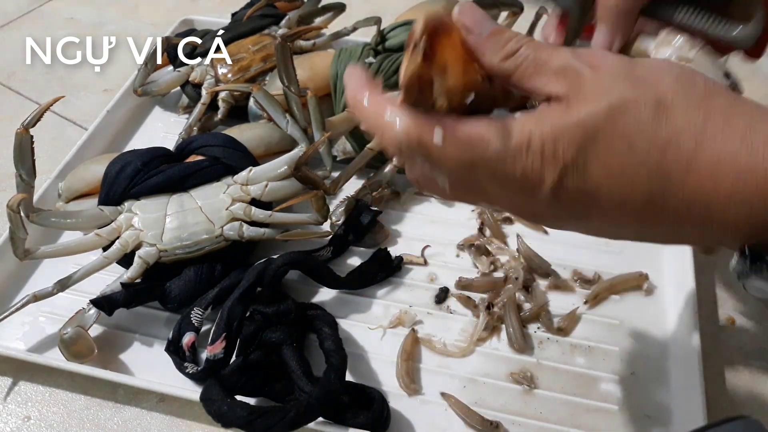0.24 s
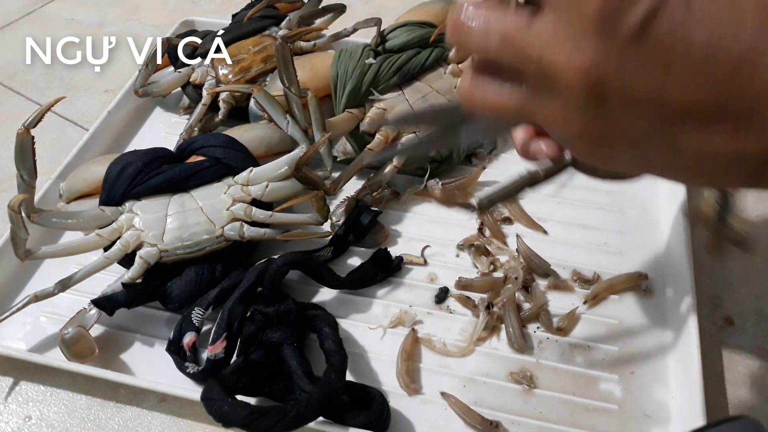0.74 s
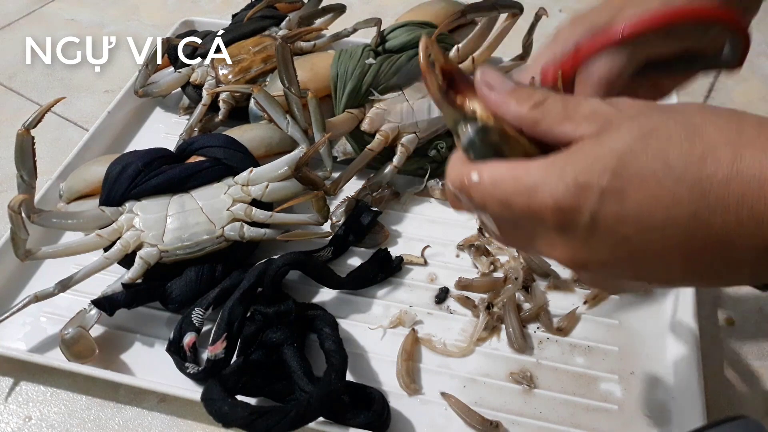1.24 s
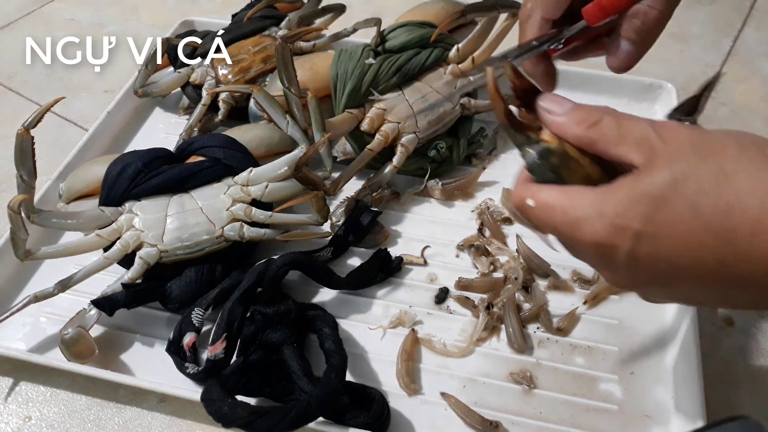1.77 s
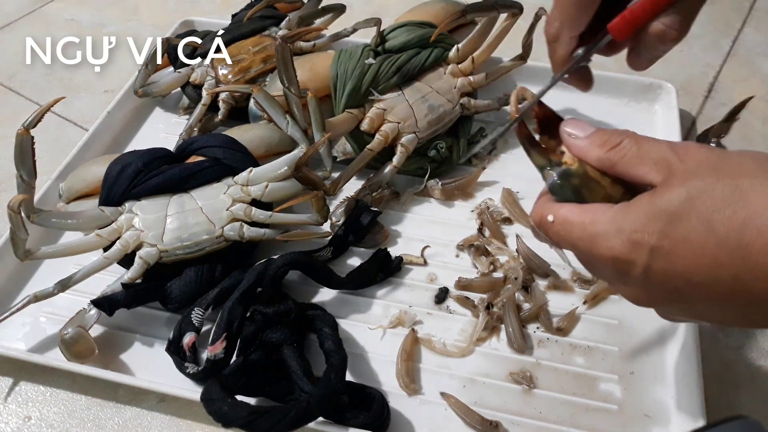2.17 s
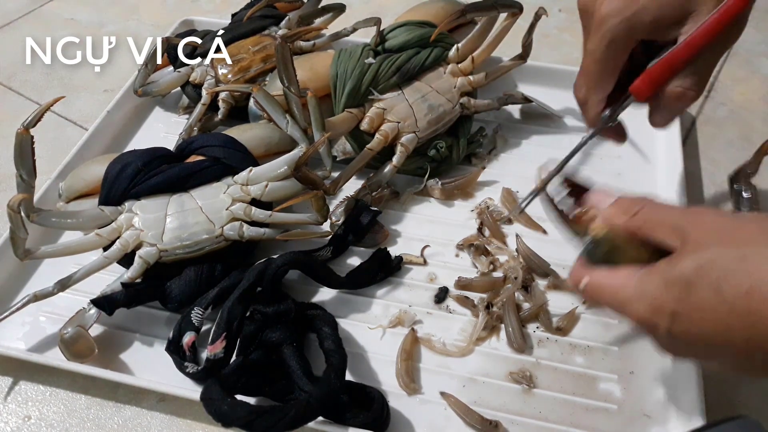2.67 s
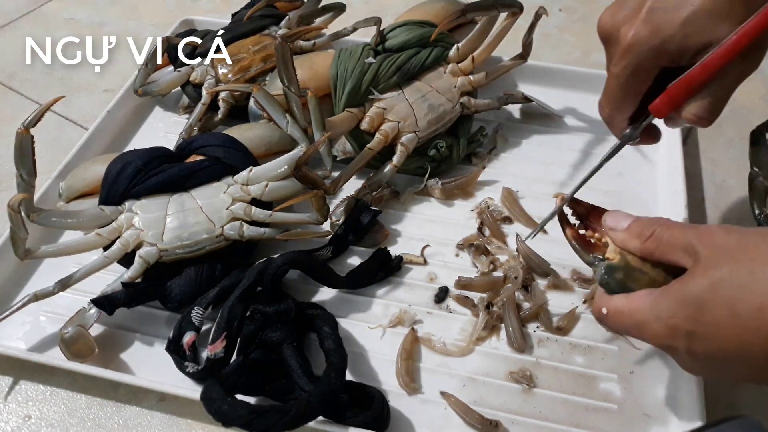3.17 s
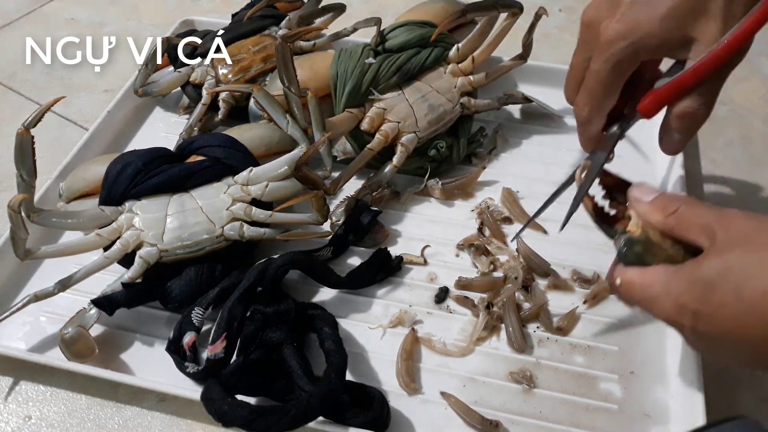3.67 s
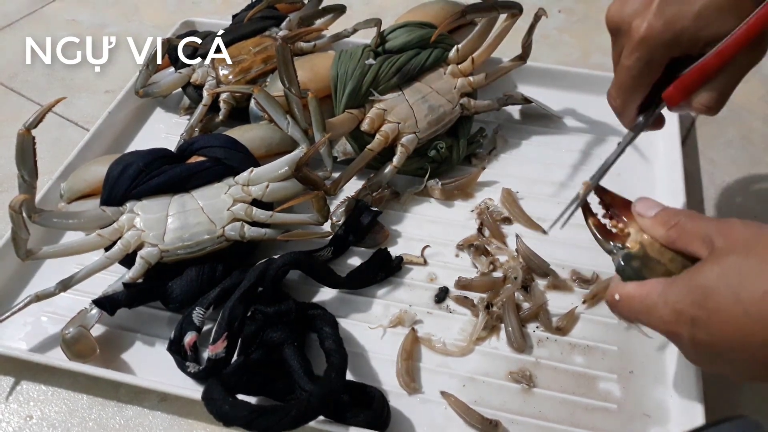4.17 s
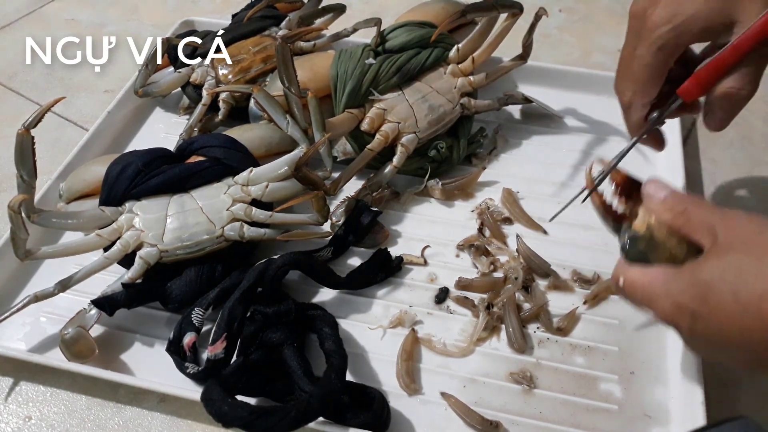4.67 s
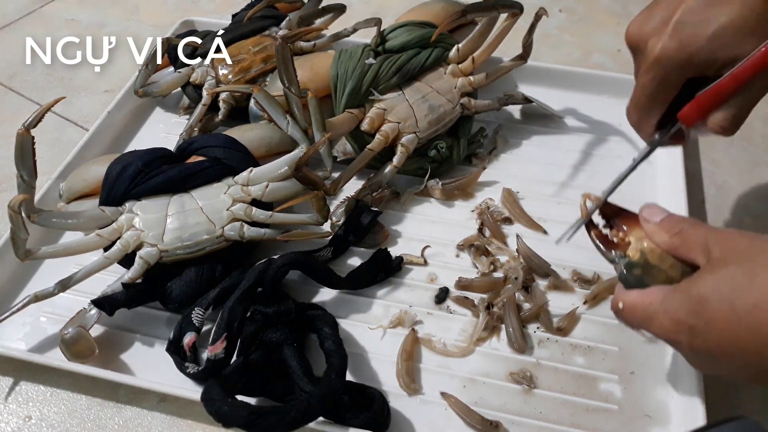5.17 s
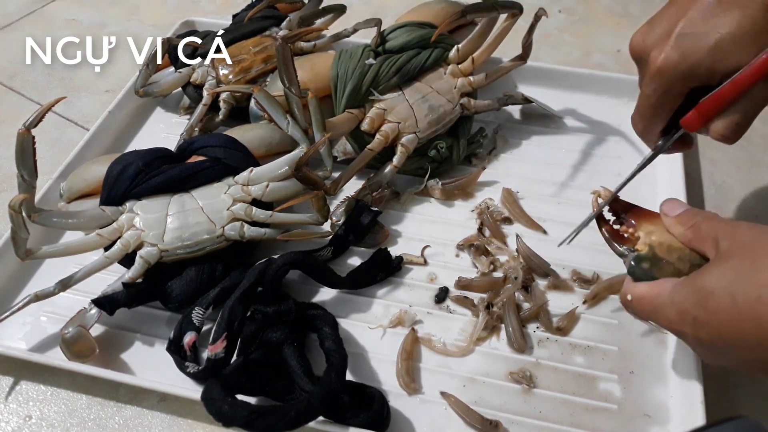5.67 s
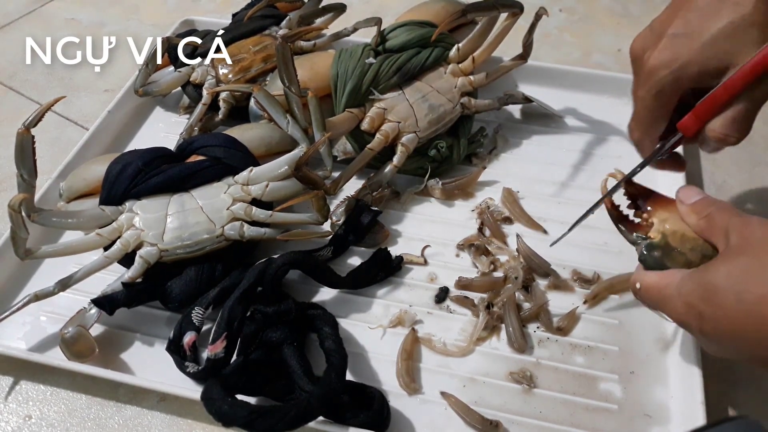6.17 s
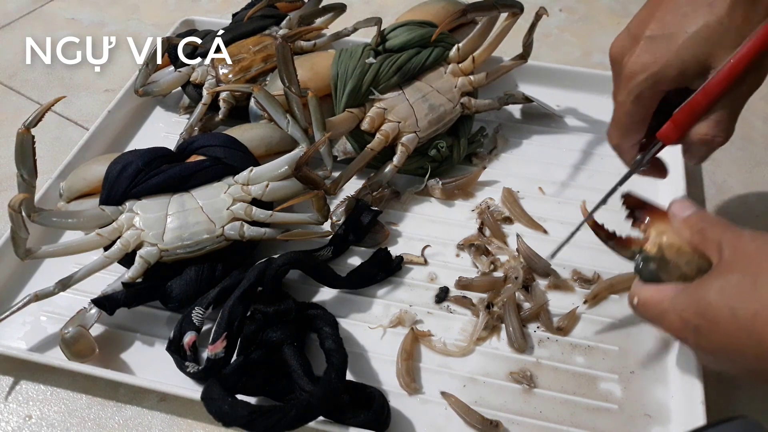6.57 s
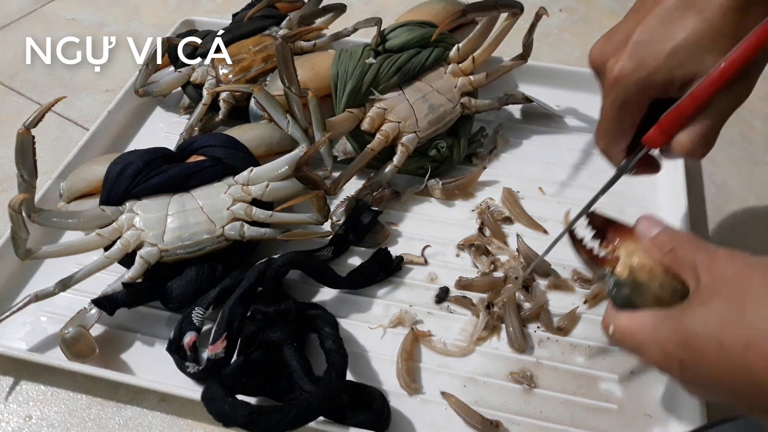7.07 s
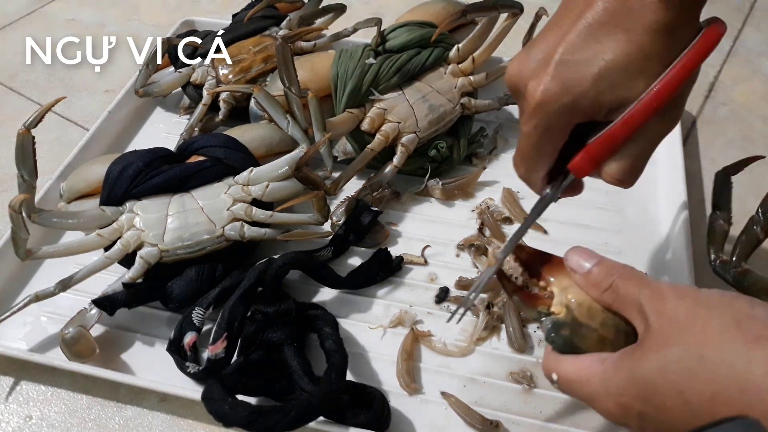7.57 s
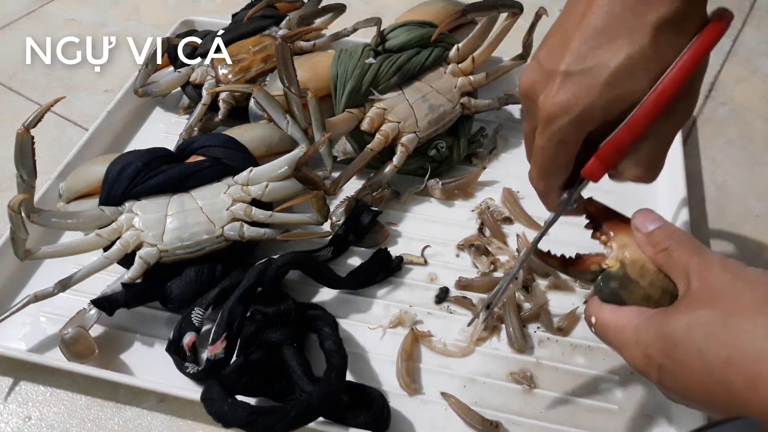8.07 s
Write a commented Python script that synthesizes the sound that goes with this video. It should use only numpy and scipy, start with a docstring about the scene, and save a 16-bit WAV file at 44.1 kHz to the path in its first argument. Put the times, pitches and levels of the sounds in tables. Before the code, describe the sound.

Close, crisp snaps of crab shell breaking under scissors come in irregular bursts, the blades grating and clicking between cuts.

```python
"""Kitchen scissors bite through a crab claw, close by, in a hard-walled room open to the street.
Each bite is a few milliseconds of fractures that ring the shell and the piece breaking off.
The blades grate on the shell between bites and ring when they meet; the claw gives a few low jolts.
Under it all lie an outdoor rumble, thin air noise, a faint hum and, at times, a hiss like far insects."""
import sys
import numpy as np
from scipy import signal
from scipy.fft import rfft, irfft
from scipy.io import wavfile

SR = 44100
rng = np.random.default_rng(int(sys.argv[2]) if len(sys.argv) > 2 else 0)


def unload_audio(sound):
    """Save the sound as a 16-bit wav file, at the path given as the first command line argument."""
    columns = np.transpose(np.atleast_2d(sound))
    # keep every value between -1 and 1, then stretch to whole-number steps
    steps = np.round(np.clip(columns, -1, 1) * 32767)
    wavfile.write(sys.argv[1], SR, steps.astype(np.int16))


N = 366471


def amp(db):
    """dB to gain."""
    return 10 ** (np.asarray(db) / 20)


def unit_rms(x):
    """Scale to rms 1."""
    return x / np.sqrt(np.mean(x ** 2) + 1e-20)


def curves(rows):
    """Breakpoint columns at every sample."""
    times_s, *columns = np.transpose(rows)
    return [np.interp(np.arange(N) / SR, times_s, column) for column in columns]


def band(x, low_hz, high_hz):
    """Band-pass."""
    sos = signal.butter(2, [low_hz, high_hz], "band", fs=SR, output="sos")
    return signal.sosfilt(sos, x + 1e-18)


def resonances(x, modes):
    """Parallel resonators with alternating signs."""
    out = 0
    for k, (pitch_hz, width_hz, level_db) in enumerate(modes):
        r = np.exp(-np.pi * width_hz / SR)
        b = [(1 - r * r) / 2, 0, (r * r - 1) / 2]
        a = [1, -2 * r * np.cos(2 * np.pi * pitch_hz / SR), r * r]
        out = out + (-1) ** k * amp(level_db) * signal.lfilter(b, a, x + 1e-18)
    return out


def coloured_noise(spectrum):
    """Steady noise with the given spectrum; rms 1."""
    freq_hz, level_db = np.transpose(spectrum)
    bins_hz = np.maximum(np.fft.rfftfreq(N, 1 / SR), 1)
    gains = amp(np.interp(np.log(bins_hz), np.log(freq_hz), level_db))
    return unit_rms(irfft(rfft(rng.standard_normal(N)) * gains, N))


def narrow_noise(pitch_hz, width_hz):
    """Noise twice through one resonator; rms 1."""
    mode = [(pitch_hz, width_hz, 0)]
    return unit_rms(resonances(resonances(rng.standard_normal(N), mode), mode))


def grit(rate_per_s, spread_db):
    """Random clicks, sizes scattered by spread_db; rms 1."""
    sizes = amp(spread_db * np.minimum(rng.exponential(1, N), 4)) * rng.choice([-1, 1], N)
    return unit_rms(sizes * (rng.random(N) < rate_per_s / SR))


def bursts(starts_s, levels_db, holds_ms, rise_ms, fade_ms, sag_db_per_ms=0.28):
    """Envelope: each burst rises, sags while it holds, then fades."""
    out, age_ms = np.zeros(N), np.arange(SR // 20) * 1000 / SR
    onset = (1 - np.exp(-age_ms / rise_ms)) * amp(-sag_db_per_ms * age_ms)
    for start_s, level_db, hold_ms in zip(starts_s, levels_db, holds_ms):
        shape = amp(level_db) * onset * np.exp(-np.maximum(age_ms - hold_ms, 0) / fade_ms)
        at = round(start_s * SR)
        out[at:at + len(shape)] += shape[:N - at]
    return out


# Rumble spectrum: freq_hz, density_db
RUMBLE_SPECTRUM = [(12, -49.5), (20, -24), (37, -13.5), (97, -1.5), (134, -4.5), (167, -0.5), (260, -7),
                   (288, -7.5), (398, -8.5), (528, -14), (608, -14), (1640, -29), (2500, -39),
                   (3250, -69.5), (5500, -120)]
# Hums in the rumble: pitch_hz, width_hz, level_db
HUMS = [(46.5, 1.7, -12.5), (101.6, 14, -6), (172, 29, -12), (261, 9.1, -7.5), (399.8, 24, -17)]
# Air noise spectrum: freq_hz, density_db
AIR_SPECTRUM = [(900, -39.5), (1300, -14), (2000, -15), (2700, -15.5), (3600, -11), (4800, -11.5),
                (6300, -18.5), (7300, -13), (8800, -18.5), (9500, -31.5), (13000, -23.5), (16000, -27.5)]
# Background levels, sinking after the loudest cracks, then swelling: time_s, rumble_db, air_db
BACKGROUND_LEVELS = [(0, -47, -62), (1, -48, -63), (2, -48, -63), (3, -47, -63), (4, -46.5, -57.5),
                     (5, -47, -60.5), (5.58, -46, -54.5), (5.75, -51.5, -76), (6.2, -54.5, -44.5),
                     (6.5, -57, -63.5), (6.9, -54, -65.5), (7.1, -53.5, -71), (7.35, -48.5, -67),
                     (7.62, -43.5, -62.5), (7.94, -41.5, -56.5), (8.17, -37.5, -61.5), (8.31, -40, -52)]


def background():
    """Low rumble with wavering hums, and thin air noise."""
    rumble_db, air_db = curves(BACKGROUND_LEVELS)
    modes = [(hz, width_hz, db - 10 * np.log10(width_hz)) for hz, width_hz, db in HUMS]
    hums = unit_rms(resonances(rng.standard_normal(N), modes))
    rumble = coloured_noise(RUMBLE_SPECTRUM) + amp(-4) * hums
    return amp(rumble_db) * rumble + amp(air_db) * coloured_noise(AIR_SPECTRUM)


# Hiss bands: pitch_hz, width_hz, level_db
HISS_BANDS = [(4590, 470, -3), (4870, 240, -4)]
# Hiss envelope: time_s, level_db
HISS_LEVELS = [(0, -57.5), (.5, -57.5), (.8, -56), (.95, -67.5), (1.3, -73), (6.5, -74.5), (7.2, -81),
               (7.5, -68.5), (8.31, -68.5)]


def insect_hiss(waver_db=1.5, waver_hz=(1, 5.6)):
    """A narrow, wavering hiss like far insects."""
    swell_db = waver_db * unit_rms(band(rng.standard_normal(N), *waver_hz))
    hiss = sum(amp(db) * narrow_noise(hz, width_hz) for hz, width_hz, db in HISS_BANDS)
    return amp(curves(HISS_LEVELS)[0] + swell_db) * hiss


# Hum envelope: time_s, level_db
FAINT_HUM_LEVELS = [(0, -91), (5.6, -67), (6.3, -68.5), (7.2, -64), (7.6, -53), (8.0, -52), (8.31, -51)]


def faint_hum():
    """A narrow hum that grows toward the end."""
    return amp(curves(FAINT_HUM_LEVELS)[0]) * narrow_noise(pitch_hz=613, width_hz=94)


# Claw shell modes: pitch_hz, width_hz, level_db
SHELL_MODES = [(2022, 1970, 1), (3050, 950, 4.5), (3900, 780, 1), (4198, 300, 4), (5700, 1050, 0.5),
               (7920, 550, 1), (8585, 620, -2)]
# Splinter modes: pitch_hz, width_hz, level_db
SPLINTER_MODES = [(10120, 1600, -0.5), (11530, 1500, 1.5), (12500, 540, 0.5), (13300, 980, -2),
                  (15000, 1200, -4)]


def shell_voices(clicks):
    """Clicks heard through five parts of the claw."""
    ringing = resonances(clicks, SHELL_MODES)
    wall = amp(11.5) * band(ringing, 2882, 5170)
    hollow = amp(15.5) * band(clicks, 450, 1500)
    body = amp(12) * band(ringing, 1600, 3700)
    cut_edge = amp(13.5) * band(ringing, 7260, 9300)
    splinters = amp(9) * band(resonances(clicks, SPLINTER_MODES), 9300, 17000)
    return wall, hollow, body, cut_edge, splinters


# Shell cracks: start_s, level_db, length_ms, depth_db, bright_db, room_db, piece_hz
CRACKS = [(0.078, -57.5, 2.8, 1, -20, 6, 4650), (0.215, -63, 0.8, -8, 8.5, 9, 8600),
          (0.4007, -51.5, 1.4, 2, -0.5, 4, 4900), (0.9711, -54, 2.5, -11, -11, 7, 4600),
          (1.076, -56, 2.6, -16, -13, -2, 7400), (1.2273, -51, 2.7, -6, 14, -1, 8550),
          (1.272, -60.5, 3, 5, -8, -6, 2800), (1.497, -33.5, 1.7, -0.5, -5.5, 10.5, 2930),
          (1.5151, -23, 3.1, -19.5, -23, -7, 4160), (1.649, -38.5, 12.6, -4, -15, 1, 4400),
          (1.808, -45.5, 4, -9, -4, -1, 2740), (2.2172, -35.5, 8.8, -5, 0, 1.5, 5770),
          (2.3611, -28, 8.3, -3.5, 0, 2, 5750), (2.6044, -46, 4.4, -6, -7, 7, 6330),
          (2.6192, -43.5, 5, -23, 0, 5.5, 8950), (2.8258, -43, 2.5, -7, -9, 1, 3900),
          (2.8849, -35, 5.4, -4.5, -3.5, 1.5, 1980), (2.9997, -33.5, 10.8, 1, 1.5, 0.5, 2160),
          (3.2294, -32, 7.4, -0.5, -3, 3, 4350), (3.4494, -51.5, 1.1, -3, -12, 16.5, 6100),
          (3.486, -48, 6, -1.5, -13, -5, 1460), (3.502, -48, 11, -17, 9, 0, 8650),
          (3.785, -50.5, 5, -7, 1, -5, 7390), (3.8431, -39, 10.5, -3, 3.5, 4.5, 5600),
          (3.9629, -34.5, 1.7, -14, 5, 0, 4300), (3.988, -21.5, 7.6, 0, 4.5, 0.5, 3810),
          (4.3727, -53, 13, -3, 7, -10, 8810), (4.447, -61, 2.5, 0, 5, -8, 8420),
          (4.5812, -45, 4.4, -6, -2, 7, 8360), (4.6519, -25, 2.6, -3, -3.5, 1, 4360),
          (4.92, -26, 6.3, -7, -3.5, -0.5, 4140), (5.0535, -45, 1.8, -6, -9, 3, 5990),
          (5.191, -40, 12.5, -15, 2, 6, 5230), (5.3614, -43, 9.5, -1.5, 2.5, 5, 4860),
          (5.429, -28, 9.3, 2.5, 1, -0.5, 5200), (5.5774, -19.5, 3.8, -1, 3, 8.5, 5070),
          (5.5915, -27.5, 2, -7.5, 7, 9.5, 5400), (5.5977, -21, 2.4, -8, -1, -5, 5250),
          (5.603, -18, 3, -7, -2, 6, 5570), (5.813, -45, 1.7, -6, 5, -6, 2760),
          (5.926, -48.5, 6.4, -11, 2.5, -7.5, 5230), (5.981, -53.5, 1.5, -2.5, -11, -3, 4230),
          (5.9996, -58.5, 2, 8.5, 13.5, -2.5, 8210), (6.035, -54, 1.5, -8, 1.5, -2.5, 4200),
          (6.059, -55.5, 1.6, 1, 9, -3, 4200), (6.0952, -41, 4.4, -11, 8.5, 2, 4240),
          (6.1126, -43.5, 2.3, -16, 8.5, -2.5, 3620), (6.1214, -33.5, 2.6, -0.5, 3, -2.5, 4130),
          (6.1455, -19.5, 4.7, -11, 1.5, -1.5, 6190), (6.152, -16.5, 3.5, -10.5, -3, -1, 4060),
          (6.1858, -41, 3, 6.5, 4.5, -5, 8200), (6.1933, -39.5, 3, -2.5, 6.5, -2, 5086),
          (6.3391, -46, 3.3, -7, 0, 5, 3880), (6.559, -57.5, 2.6, -3.5, -11, -5, 8400),
          (6.6923, -55.5, 2.5, -1, 5, 2.5, 5630), (6.774, -47, 8.3, -3, 0.5, -2, 3600),
          (6.8075, -53.5, 4, 10, -15, -4, 2820), (6.8297, -51.5, 2.9, -4, -1.5, -2, 4760),
          (7.7232, -51, 2.4, -7, -5, 2, 3100), (7.7378, -43, 2, 2, -15, 6, 3200),
          (7.7518, -44, 2.3, -5, -12, 0, 3000), (7.7676, -45, 2.4, 4.5, -5, 6.5, 3130),
          (8.118, -43.5, 5, -17, 2, -3, 4050), (8.1752, -40, 7.3, 1, 2.5, -3, 3860),
          (8.1997, -57, 2, 2, 12, -3, 8300), (8.2178, -35.5, 8.1, 2, 4.5, 0, 5100),
          (8.277, -44, 2.4, 0, -22, -3, 2800)]


def cracks():
    """Dense runs of fractures; the room gets each run's energy as one blow. Returns near, send."""
    start_s, level_db, length_ms, depth_db, bright_db, room_db, _ = np.transpose(CRACKS)
    at = np.round(start_s * SR).astype(int)
    blow_gain = np.sqrt((length_ms + 1) * SR / 1000)
    voices = shell_voices(grit(rate_per_s=14000, spread_db=6))
    near, send = np.zeros(N), np.zeros(N)
    for k, voice_db in enumerate([0, depth_db - 9, depth_db, bright_db + 0.5, bright_db - 5.5]):
        near += voices[k] * bursts(start_s, level_db + voice_db, length_ms, rise_ms=0.33, fade_ms=2)
        blows = np.zeros(N)
        blows[at] = blow_gain * amp(level_db + voice_db + room_db)
        send += shell_voices(blows)[k]
    return near, send


def broken_pieces(q=12, chip_db=-8.5, low_hz=1775, high_hz=9350):
    """Each crack rings the broken piece and two chips of random pitch. Returns near, send."""
    near, send = np.zeros(N), np.zeros(N)
    fractures = grit(rate_per_s=6000, spread_db=4)
    for start_s, level_db, length_ms, _, _, room_db, piece_hz in CRACKS:
        at = round(start_s * SR)
        span = slice(at, at + SR // 20)
        age_ms = np.arange(len(fractures[span])) * 1000 / SR
        shaking = fractures[span] * np.exp(-np.maximum(age_ms - length_ms, 0) / 1.7)
        chips_hz = low_hz * (high_hz / low_hz) ** rng.random(2)
        parts = [(piece_hz, 0)] + [(hz, chip_db) for hz in chips_hz]
        modes = [(hz, hz / q, db - 10 * np.log10(hz / q / SR)) for hz, db in parts]
        ring = amp(level_db) * resonances(shaking, modes)
        near[span] += amp(-5) * ring
        send[span] += amp(room_db - 6.5) * ring
    return near, send


# Strokes on the shell: peak_s, level_db, swell_ms, fade_ms, depth_db, bright_db
STROKES = [(0.696, -70, 180, 690, 6, -9), (0.986, -63.5, 130, 200, -2, -11),
           (1.174, -51.5, 58, 66, -20, -4.5), (1.235, -71, 40, 120, -6, 2), (1.658, -44, 59, 61, 4, -10),
           (1.698, -37, 65, 16, -10, -5.5), (1.794, -49, 66, 66, -2, -3), (2.05, -49, 24, 13, -16, 0),
           (2.074, -50, 10, 54, -11, -1), (2.622, -42, 17, 54, -10, 4.5), (2.66, -60, 40, 100, 3, -3),
           (2.832, -46.5, 70, 42, -6, -1), (3.508, -38.5, 12, 100, -5, 1), (3.784, -56.5, 68, 64, -12.5, 3),
           (4.382, -54.5, 87, 32, -3, -3), (4.648, -45, 46, 27, -4, 0), (4.775, -59, 40, 100, -12, -7),
           (4.835, -41, 67, 9.8, -5.5, -2), (4.89, -51, 100, 20, -6, -10), (5.196, -41.5, 21, 66, -5.5, 1),
           (5.934, -35.5, 17, 18.5, -13, 0.5), (6.03, -61, 150, 47, 9, -10), (6.778, -57, 12, 22, -10.5, 4),
           (6.808, -63, 21, 87, -6, 3), (7.738, -58, 60, 60, 2, -20), (7.808, -45.5, 45, 91, -9, 1),
           (8.105, -58, 15, 160, 1, -15), (8.177, -39.5, 3.7, 38, -10, -3), (8.218, -38, 8, 75, -10, -3.5)]


def grating(range_db=20):
    """Blades and fingers slip over rough shell; a stroke swells and fades by range_db in its times."""
    wall, hollow, body, cut_edge, splinters = shell_voices(grit(rate_per_s=7400, spread_db=2.5))
    deep = body + amp(-11.5) * hollow
    bright = cut_edge + amp(-8) * splinters
    time_ms, out = np.arange(N) * 1000 / SR, np.zeros(N)
    for peak_s, level_db, swell_ms, fade_ms, depth_db, bright_db in STROKES:
        from_peak = np.maximum((1000 * peak_s - time_ms) / swell_ms, (time_ms - 1000 * peak_s) / fade_ms)
        on = from_peak < 2
        taper = np.minimum(2 * (2 - from_peak[on]), 1)
        pressure = amp(level_db - range_db * from_peak[on]) * taper
        out[on] += pressure * (wall[on] + amp(depth_db) * deep[on] + amp(bright_db) * bright[on])
    return out


# Blade contacts: start_s, level_db
BLADE_TAPS = [(0.794, -51.5), (1.127, -45.5), (2.2396, -25.5), (2.385, -33), (2.9096, -27.5), (3.023, -20),
              (3.255, -38), (3.8659, -29), (4.0104, -20), (4.6208, -41), (4.7995, -38), (4.8264, -37),
              (4.903, -47), (4.9397, -23.5), (4.982, -36), (5.222, -34.5), (5.2873, -40), (5.3857, -32),
              (5.456, -30.5), (5.4906, -30.5), (6.797, -44), (8.2424, -37), (8.2654, -37)]
# Steel modes: pitch_hz, level_db, t60_s
BLADE_MODES = [(7690, 2, 0.029), (7830, -8, 0.024), (11700, -10, 0.008), (12600, -18, .006),
               (14300, -16.5, .004)]


def blades(chatter_ms=9.3):
    """Steel chatters briefly on steel, ticking and ringing the blade modes."""
    start_s, tap_db = np.transpose(BLADE_TAPS)
    holds_ms = np.full(len(start_s), chatter_ms)
    contact = bursts(start_s, tap_db - 21, 0.24 * holds_ms, rise_ms=2.2, fade_ms=1)
    contact += bursts(start_s, tap_db - 26, holds_ms, rise_ms=0.3, fade_ms=1.5)
    chatter = grit(rate_per_s=5000, spread_db=0) * contact
    tick = amp(9.5) * band(chatter, 7700, 15500)
    ring = np.zeros(N)
    for pitch_hz, level_db, t60_s in BLADE_MODES:
        r, w = amp(-60 / (t60_s * SR)), 2 * np.pi * pitch_hz / SR
        mode = signal.lfilter([0, np.sin(w)], [1, -2 * r * np.cos(w), r * r], chatter + 1e-18)
        ring += amp(level_db) * mode
    return tick + ring


# Low jolts: start_s, level_db, pitch_hz, t60_s
JOLTS = [(5.5767, -4, 77, 0.025), (5.967, -33, 242, 0.033), (6.013, -36, 220, 0.026),
         (6.152, -27, 198.4, 0.034), (7.084, -41, 198, 0.071)]


def jolts(rise_s=0.001, drop_s=0.0014):
    """The claw gives way or knocks: short thumps that drop at once to their pitch."""
    out = np.zeros(N)
    for start_s, level_db, pitch_hz, t60_s in JOLTS:
        age_s = np.maximum(np.arange(N) / SR - start_s, 0)
        cycles = pitch_hz * (age_s + 0.0073 * (1 - np.exp(-age_s / drop_s)))
        envelope = amp(level_db - 60 * age_s / t60_s) * (1 - np.exp(-age_s / rise_s))
        out += envelope * np.sin(2 * np.pi * cycles)
    return out


# Room decay: freq_hz, t60_s, level_db
ROOM_DECAY = [(300, 0.1, -1), (800, .5, -2), (2100, 0.54, -5.5), (5500, 0.58, -6), (8950, 0.46, -8),
              (14600, 0.35, -2.5)]


def room(send, build_s=0.0027, wet_db=-34.5):
    """Dense echoes off hard walls build up, arrive unevenly at first and die band by band."""
    age_s = np.arange(int(0.7 * SR)) / SR
    edges_hz = 200 * 2 ** np.arange(0, 6.6, 0.5)
    freq_hz, t60_s, level_db = np.transpose(ROOM_DECAY)
    echoes = 0
    for low_hz, high_hz in zip(edges_hz, edges_hz[1:]):
        log_centre = np.log(low_hz * high_hz) / 2
        band_db = np.interp(log_centre, np.log(freq_hz), level_db)
        band_t60_s = np.interp(log_centre, np.log(freq_hz), t60_s)
        noise = band(rng.standard_normal(len(age_s)), low_hz, high_hz)
        echoes = echoes + amp(band_db - 60 * age_s / band_t60_s) * noise
    echoes *= np.clip(age_s / build_s, 0, 1) ** 2
    uneven_db = 4.5 * np.repeat(rng.standard_normal(len(age_s) // 100 + 1), 100)[:len(age_s)]
    echoes *= amp(uneven_db * np.exp(-age_s / 0.042))
    return amp(wet_db) * signal.fftconvolve(send, echoes)[:N]


def scene():
    """Scissors and claw, their echoes and the background; mono."""
    pieces_near, pieces_send = broken_pieces()
    cracks_near, cracks_send = cracks()
    steel, rubbing = blades(), grating()
    near = cracks_near + pieces_near + rubbing + steel + jolts()
    echoes = room(cracks_send + pieces_send + rubbing + amp(-3) * steel)
    return (near + echoes + background() + insect_hiss() + faint_hum())[None]


def record(dry, cutoff_hz=15700):
    """Soft clip, then a steep low-pass."""
    lowpass = signal.ellip(8, 0.5, 60, cutoff_hz, fs=SR, output="sos")
    return signal.sosfilt(lowpass, np.tanh(dry))


dry = scene()
out = record(dry)
unload_audio(out)
```